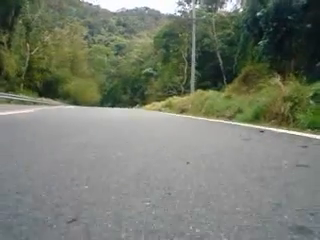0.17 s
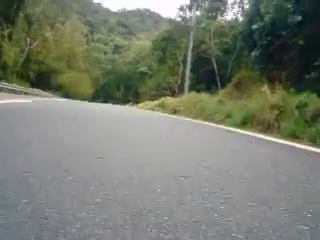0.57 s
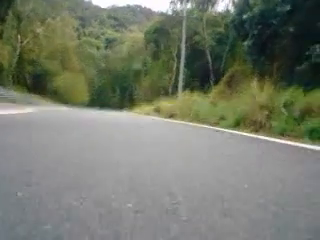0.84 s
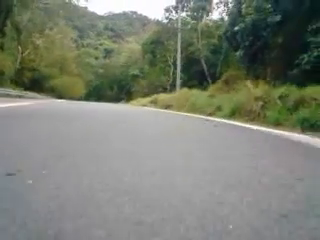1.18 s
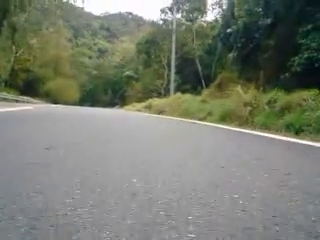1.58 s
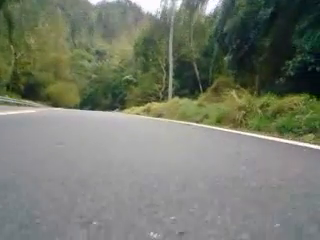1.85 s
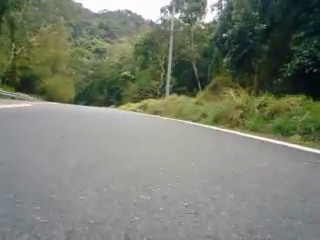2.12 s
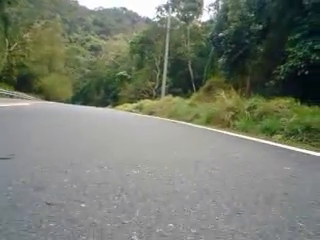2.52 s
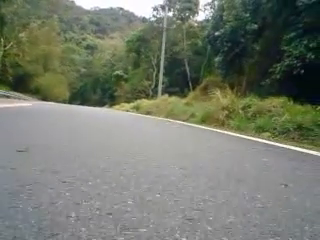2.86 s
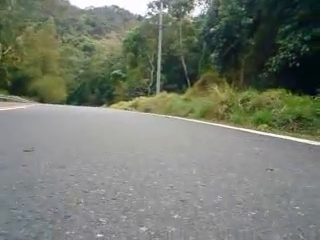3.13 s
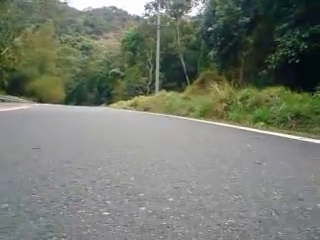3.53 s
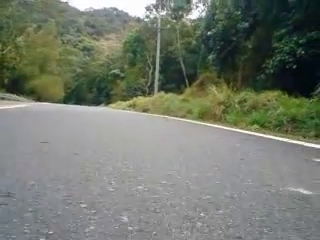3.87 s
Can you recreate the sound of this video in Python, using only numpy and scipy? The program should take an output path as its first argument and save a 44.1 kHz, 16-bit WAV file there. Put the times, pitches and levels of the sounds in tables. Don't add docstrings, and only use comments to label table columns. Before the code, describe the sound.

Small hard wheels start rolling on rough asphalt at about 0.1 s and quickly swell into a dense, hollow plastic rattle with low deck rumble, ticks and knocks, strongest at 0.4-1.7 s, with a hard blow near 0.73. It weakens unevenly from 1.9 s. Two harsh jolts hit around 2.9 and 3.0, then sparse faint rattles, near-stillness with hiss from 3.3, and a small bump at 3.9. Close, narrow-band, dry outdoor sound.

```python
import sys
import numpy as np
from scipy import signal
from scipy.fft import rfft, irfft, next_fast_len
from scipy.io import wavfile
from scipy.ndimage import uniform_filter1d, map_coordinates

SR = 44100
rng = np.random.default_rng(int(sys.argv[2]) if len(sys.argv) > 2 else 0)


def materialize(psi):
    bounded = np.clip(np.atleast_2d(psi).T, -1, 1)
    quanta = np.round(bounded * 32767).astype(np.int16)
    wavfile.write(sys.argv[1], SR, quanta)


def natural_amplitude(level_db):
    exponent = np.asarray(level_db, float) / 20
    return 10 ** exponent


N = 176400

# frequency [Hz], density [dB per Hz].
HISS_SPECTRUM = [(30, -13), (100, -19), (350, -8.5), (900, -3), (3200, 3.5), (4400, -2.5)]
# time [s], shaking [dB], extra share of the deck [dB].
ROLLING = [(0.099, -49, 7), (0.131, -38.5, 3), (0.362, -23, -4.5), (.8, -21, -8), (.9, -25.5, -1.5),
           (1.699, -23, -8), (1.952, -30.5, -6), (2.102, -22, -11), (2.3, -36, -3), (2.4, -30.5, -5.5),
           (2.57, -41, 2.5), (2.63, -27, -12), (3.08, -40, 0), (3.201, -29, -16), (3.28, -50, 6),
           (3.79, -54, 11), (3.901, -29, -4), (4, -35.5, -3.5)]
# frequency [Hz], width [Hz], level [dB].
BODY_MODES = [(287, 29, -9.5), (398, 43, -6.5), (564, 350, -25), (711, 100, -6), (988, 81, -6.5),
              (1207, 55, -9.5), (1383.5, 37, -4.5), (1540, 51, -4.5), (1788.4, 80, 1.5), (2500, 2100, -19),
              (2580, 1000, -10), (3170, 370, -9.5), (3900, 340, -15.5)]
# frequency [Hz], density [dB per Hz].
RUMBLE_SPECTRUM = [(25, -32), (60, -5), (150, -5), (250, -1.5), (500, -1.5), (3000, -14.5)]
# time [s], peak [dB], frequency [Hz].
SURGES = [(0.1135, -19, 1450), (0.264, -18.5, 1780), (0.3246, -20.5, 1390), (0.3596, -17, 1780),
          (0.404, -15, 1770), (0.4513, -12.5, 1730), (0.478, -11, 1840), (0.5222, -15.5, 1820),
          (0.5458, -11, 1810), (0.5881, -15, 1780), (0.6225, -26, 1770), (0.6569, -23, 1740),
          (0.682, -13.5, 1890), (0.7063, -11, 1800), (0.7592, -14, 1780), (0.7826, -14, 1770),
          (0.852, -21.5, 1410), (0.9254, -13.5, 1770), (0.9522, -23, 1750), (1.058, -18.5, 1770),
          (1.0979, -16, 1380), (1.112, -14, 1390), (1.1755, -15.5, 1850), (1.1842, -12, 1360),
          (1.2305, -16.5, 1370), (1.2719, -14, 1390), (1.3348, -20, 1770), (1.3647, -16.5, 1880),
          (1.4267, -17, 1780), (1.4745, -20.5, 1780), (1.5192, -14, 1790), (1.551, -15, 1790),
          (1.6127, -21, 1770), (1.6477, -18.5, 1470), (1.6874, -17.5, 1780), (1.7572, -16, 1820),
          (1.7882, -17, 1770), (1.922, -21.5, 1420), (1.98, -16.5, 1378), (2.0142, -18.5, 1730),
          (2.0302, -26, 1760), (2.0547, -24.5, 1540), (2.079, -15, 1820), (2.0958, -7, 1770),
          (2.1286, -16.5, 1790), (2.3265, -26.5, 1900), (2.423, -21.5, 1800), (2.5566, -28.5, 1840),
          (2.593, -19, 1808), (2.6398, -20.5, 1904), (2.7152, -15, 1810), (2.7733, -10, 1820),
          (2.807, -27.5, 1940), (2.827, -21, 1850), (2.851, -14.5, 1840)]
# time [s], peak [dB], frequency [Hz].
LAST_SURGES = [
    (3.1437, -28.5, 1840),
    (3.1774, -42, 1910),
    (3.2058, -23.5, 1780),
    (3.701, -36.5, 1875),
    (3.8304, -29, 1763),
    (3.8663, -19.5, 1830),
    (3.8918, -22.5, 1330),
    (3.91, -20, 1516),
    (3.9739, -24, 2090),
]
# time [s], peak [dB], frequency [Hz].
KNOCKS = [(0.114, -21.5, 945), (0.361, -22, 915), (0.417, -19, 972), (0.435, -17, 1030),
          (0.666, -21.5, 875), (0.709, -20, 953), (0.771, -14.5, 748), (0.895, -20.5, 1250),
          (0.973, -23, 1080), (1.065, -20.5, 988), (1.097, -25.5, 1050), (1.182, -31, 977),
          (1.324, -19, 651), (1.345, -17, 958), (1.544, -24, 1030), (1.777, -24.5, 912), (1.83, -26.5, 956),
          (1.87, -26, 1060), (2.096, -22.5, 961), (2.787, -17, 697), (3.117, -23.5, 756),
          (3.209, -27.5, 974), (3.56, -35, 1040), (3.935, -18.5, 999)]
# time [s], peak [dB].
TICKS_EARLY = [(0.1171, -22), (0.2049, -23), (0.2264, -33), (0.3003, -19.5), (0.3441, -17), (0.3583, -13.5),
               (0.3783, -13.5), (0.403, -14), (0.4669, -12), (0.5253, -9.5), (0.5479, -13.5),
               (0.5665, -7.5), (0.5849, -13), (0.603, -18), (0.6708, -21), (0.6825, -7.5), (0.7065, -8.5),
               (0.7259, -10), (0.8113, -15), (0.8302, -12.5), (0.8538, -11), (0.8924, -11), (0.8929, -14.5),
               (0.9098, -16), (0.9392, -13), (0.976, -14), (0.9974, -16.5), (1.0608, -13), (1.0987, -12.5),
               (1.119, -11.5), (1.1418, -17.5), (1.1812, -16), (1.219, -15), (1.255, -11.5), (1.2787, -12),
               (1.3032, -15.5)]
# time [s], peak [dB].
TICKS_LATE = [(1.3039, -19), (1.3436, -15), (1.3623, -8), (1.383, -13), (1.4042, -14), (1.426, -14.5),
              (1.4472, -12), (1.474, -9), (1.4945, -9), (1.5183, -16.5), (1.5412, -17), (1.5654, -13.5),
              (1.6152, -21), (1.71, -16.5), (1.734, -18.5), (1.8631, -14.5), (1.8804, -15), (1.9084, -14.5),
              (1.9327, -21), (1.945, -21), (2.0413, -16.5), (2.0588, -19.5), (2.1493, -22.5),
              (2.2101, -20.5), (2.2897, -28.5), (2.3511, -16.5), (2.6294, -15), (2.8053, -16),
              (2.8275, -12.5), (3.071, -22.5), (3.1168, -25), (3.1547, -22), (3.1798, -20.5), (3.243, -25),
              (3.6596, -27.5), (3.677, -23.5), (3.702, -25.5), (3.9383, -13.5), (3.9493, -14.5),
              (3.9745, -19)]
# frequency [Hz], level [dB], 60 dB decay [s].
TICK_MODES = [(1982, -7.5, 0.011), (2890, -5, 0.013), (3279, -2, 0.0072)]
# time [s], peak [dB], frequency [Hz].
THUMPS = [(0.304, -25, 398), (0.358, -27.5, 410), (0.411, -30, 509), (0.442, -24, 380), (0.497, -22.5, 290),
          (0.564, -36, 404), (0.62, -28, 408), (0.778, -20, 380), (1.069, -25.5, 412), (1.099, -24, 398),
          (1.242, -26.5, 290), (1.379, -27.5, 390), (1.494, -39, 385), (1.547, -25, 430),
          (1.66, -23.5, 384), (1.765, -36.5, 450), (2.056, -25.5, 407), (2.095, -36, 423),
          (2.172, -26, 410), (2.323, -37.5, 428), (2.59, -26, 403), (2.769, -30, 500), (2.904, -29, 494),
          (2.992, -30, 259), (3.857, -28, 402), (3.935, -23.5, 500)]
# time [s], level past the overload [dB].
SLAMS = [
    (.7272, .5),
    (2.909, .25),
    (2.9118, .25),
]
# start [s], rise [s], hold [s], level [dB], casing over body [dB].
JOLTS = [(2.899, 0.0011, 0.026, -17, -7), (2.909, 0.0014, .004, -25, 8), (2.957, 0.02, 0.0057, -16.5, -3),
         (2.982, 0.0024, 0.0013, -18, 9.5), (2.989, 0.0008, .014, -14, 8), (3.01, 0.0011, .002, -24.5, 9),
         (3.016, 0.00067, .0015, -38.5, 13.5), (3.02, 0.0017, 0.0071, -33, 12.5),
         (3.029, 0.0016, 0.0012, -31.5, 17), (3.033, 0.0033, 0.0095, -43, 21.5),
         (3.05, 0.0022, 0.0056, -45.5, 21.5)]
# frequency [Hz], width [Hz], level [dB].
CASING_MODES = [(2220, 47, -2), (2330, 100, 0), (2706, 160, 15), (3002, 230, 2), (2860, 420, -19)]
# frequency [Hz], gain [dB].
RECORDER_BAND = [(3200, 0.5), (3600, -6.5), (4000, -15), (4400, -28), (4600, -39), (4680, -110)]

OVERLOAD = 0.69


def unit(x):
    return x / np.sqrt(np.mean(x ** 2) + 1e-20)


def along(points, hz):
    f, value = np.transpose(points)
    return np.interp(np.log(hz + 1), np.log(f + 1), value)


def wobble(rate, count=1):
    step = np.arange(0, N + 64, 64)
    curves = []
    for knots in rng.standard_normal((count, 800)):
        coarse = map_coordinates(knots, [step * rate / SR], mode="wrap")
        curves.append(np.interp(np.arange(N), step, coarse))
    return np.array(curves)


def filtered(x, response):
    m = next_fast_len(N + SR // 4)
    return irfft(rfft(x, m) * response(np.fft.rfftfreq(m, 1 / SR)), m)[..., :N]


def noise_like(spectrum):
    return unit(filtered(rng.standard_normal(N), lambda hz: natural_amplitude(along(spectrum, hz))))


def resonate(drive, modes):
    c, w, db = np.transpose(modes)[..., None]
    rung = filtered(drive, lambda f: natural_amplitude(db) * 1j * f * np.sqrt(w) / (c * c - f * f + 1j * f * w))
    return rung.sum(axis=0)


def shape(rise_s, hold_s, t60):
    t = np.arange(SR // 5) / SR
    decay = natural_amplitude(-60 * np.clip(t - rise_s - hold_s, 0, 1) / t60)
    return np.clip(t / rise_s, 0, 1) * decay


def add(out, s, sound):
    part = out[max(round(s * SR), 0):][:len(sound)]
    part += sound[:len(part)]


def envelope(events):
    out = np.zeros(N)
    for s, db, rise, hold, t60 in events:
        add(out, s, natural_amplitude(db) * shape(rise, hold, t60))
    return out


def hiss():
    return natural_amplitude(-42) * noise_like(HISS_SPECTRUM)


def grit(count):
    per_s, spread_db, own_share = 3000, 4, 0.65
    hit = rng.random((count + 1, N)) < per_s / SR
    size = rng.standard_normal((count + 1, N))
    stones = unit(hit * np.sign(size) * natural_amplitude(spread_db * np.abs(size)))
    return np.sqrt(own_share) * stones[1:] + np.sqrt(1 - own_share) * stones[0]


def rolling(roll_db, deck_db):
    count = len(BODY_MODES)
    lumps = natural_amplitude(0.53 * wobble(14, count=count) + 3 * wobble(70))
    is_deck = np.array([[hz < 850] for hz, width, db in BODY_MODES])
    drive = grit(count) * lumps * natural_amplitude(roll_db - 2 + is_deck * (deck_db - 4))
    norm = np.sqrt(np.pi / SR * sum(natural_amplitude(db) ** 2 for hz, width, db in BODY_MODES))
    low_cut_hz = 40
    body = filtered(resonate(drive, BODY_MODES), lambda f: 1 / (1 + (low_cut_hz / (f + 1)) ** 4))
    return body / norm


def rumble(roll_db, deck_db):
    kicks = [(s, db - 19.5, 0.008, 0.012, 0.09) for s, db, hz in THUMPS]
    kicks += [(s, db - 21, 0.004, hold, 0.06) for s, rise, hold, db, casing_db in JOLTS]
    steady_part = natural_amplitude(roll_db + deck_db - 9.5 + 2 * wobble(24)[0])
    return noise_like(RUMBLE_SPECTRUM) * (steady_part + envelope(kicks))


def stones(rows, lead_s, level_db, rise_s, hold_s, t60, width, wide_db):
    out, n = np.zeros(N), SR // 5
    f = np.fft.rfftfreq(n, 1 / SR)
    for s, db, hz in rows:
        w = hz * np.array([[width], [1]])
        scrape = rfft(rng.standard_normal((2, n)))
        mode, broad = irfft(scrape * (1j * f * w / (hz * hz - f * f + 1j * f * w)) ** 2, n)
        swell = np.abs(signal.hilbert(mode)) ** 2
        even = mode / np.sqrt(swell + 0.83 * np.mean(mode ** 2))
        blow = even + natural_amplitude(wide_db) * unit(broad) / 2
        add(out, s - lead_s, natural_amplitude(db + level_db) * shape(rise_s, hold_s, t60) * blow)
    return out


def surges():
    return stones(list(SURGES) + list(LAST_SURGES), lead_s=0.002, level_db=-2, rise_s=0.004,
                  hold_s=0.005, t60=0.035, width=0.099, wide_db=-4.5)


def knocks():
    return stones(KNOCKS, lead_s=0.001, level_db=-3.5, rise_s=0.004,
                  hold_s=0.007, t60=0.045, width=0.28, wide_db=0.5)


def ping(hz, rise_s, t60):
    t = np.arange(SR // 20) / SR
    env = (1 - np.exp(-(t / rise_s) ** 2)) * natural_amplitude(-60 * t / t60)
    return env / env.max() * np.sin(2 * np.pi * hz * t)


def chatter(roll_db, clear):
    per_s = 32
    faint = []
    for i, (late, size) in enumerate(rng.standard_normal((200, 2))):
        s = (i + 0.14 * late) / per_s
        near = np.abs(s - np.array(clear)[:, 0]).min() < 0.014
        if 0 < s * SR < N - 1 and not near:
            faint.append((s, roll_db[int(s * SR)] - 5 + 4 * size))
    return faint


def ticks(roll_db):
    out, t = np.zeros(N), np.arange(SR // 20) / SR
    clear = list(TICKS_EARLY) + list(TICKS_LATE)
    rattle = unit(filtered(rng.standard_normal(N), lambda f: np.exp(-((f - 3000) / 500) ** 2)))
    for s, db in clear + chatter(roll_db, clear):
        buzz = natural_amplitude(-15 - 60 * t / 0.06) * np.resize(rattle[int(s * SR):], len(t))
        ring = np.zeros(len(t))
        for hz, level_db, t60 in TICK_MODES:
            size, tune = rng.standard_normal(2)
            ring += natural_amplitude(level_db + 3 * size) * ping(hz * (1 + 0.038 * tune), 0.00091, t60)
        add(out, s + 0.0006, natural_amplitude(db + 1) * (ring / np.abs(ring).max() + buzz))
    return out


def thumps():
    return stones(THUMPS, lead_s=0, level_db=-3.5, rise_s=0.0022,
                  hold_s=0.012, t60=0.045, width=0.16, wide_db=-5.5)


def slammed(x):
    gain, half = np.ones(N), SR // 500
    for s, over_db in SLAMS:
        start = round(s * SR) - half // 2
        peak = start + np.argmax(np.abs(x[0, start:start + half]))
        lift = OVERLOAD * natural_amplitude(over_db) / np.abs(x[0, peak]) - 1
        gain[peak - half:peak + half + 1] += lift * np.hanning(2 * half + 1)
    return x * gain


def shaken(modes):
    x = unit(resonate(rng.standard_normal((len(modes), N)), modes))
    return unit(x / np.sqrt(uniform_filter1d(x ** 2, size=110) + 0.12))


def jolts():
    t60 = 0.015
    shake = envelope([(s, db, rise, hold, t60) for s, rise, hold, db, casing_db in JOLTS])
    ring = envelope([(s, db + casing_db, rise, hold, t60) for s, rise, hold, db, casing_db in JOLTS])
    return shake * shaken(BODY_MODES[3:]) + ring * shaken(CASING_MODES)


def scene():
    s, *columns = np.transpose(ROLLING)
    roll_db, deck_db = [np.interp(np.arange(N) / SR, s, c) for c in columns]
    road = rolling(roll_db, deck_db) + rumble(roll_db, deck_db)
    blows = surges() + knocks() + thumps() + jolts()
    return (hiss() + road + blows + ticks(roll_db))[None]


def low_pass(x):
    return signal.sosfilt(signal.butter(12, 15760, fs=SR, output="sos"), x)


def record(dry):
    narrow = filtered(dry, lambda hz: natural_amplitude(along(RECORDER_BAND, hz)))
    clipped = np.clip(slammed(narrow), -OVERLOAD, OVERLOAD)
    mix = clipped + natural_amplitude(-101) * rng.standard_normal(clipped.shape)
    return low_pass(mix)


dry = scene()
out = record(dry)
materialize(out)
```